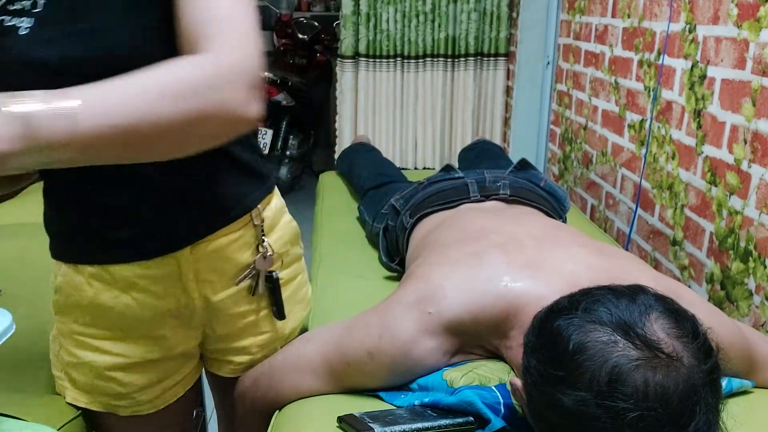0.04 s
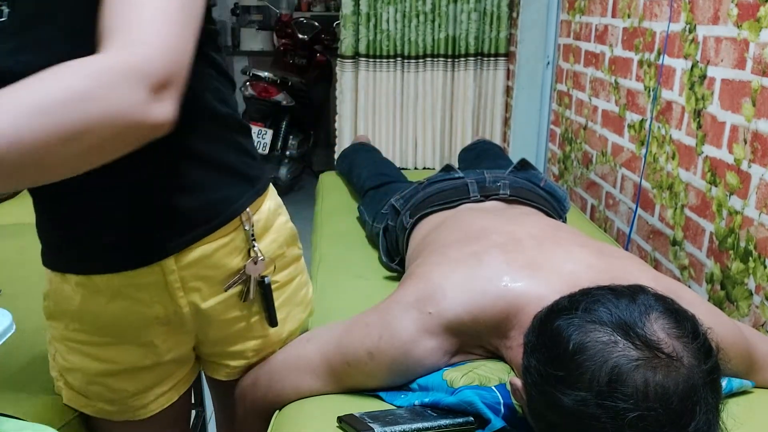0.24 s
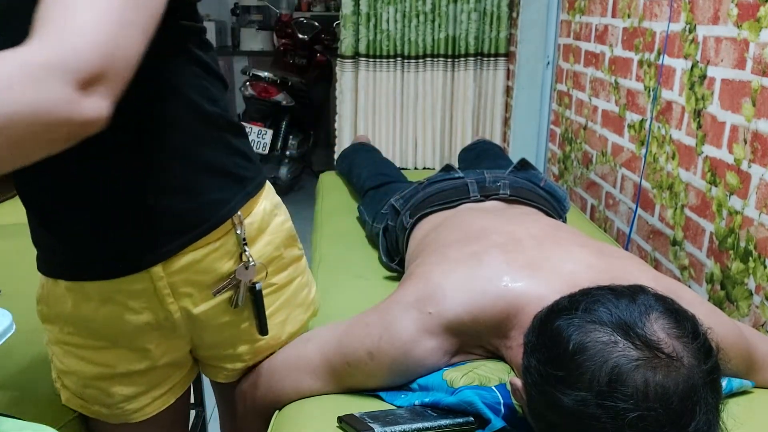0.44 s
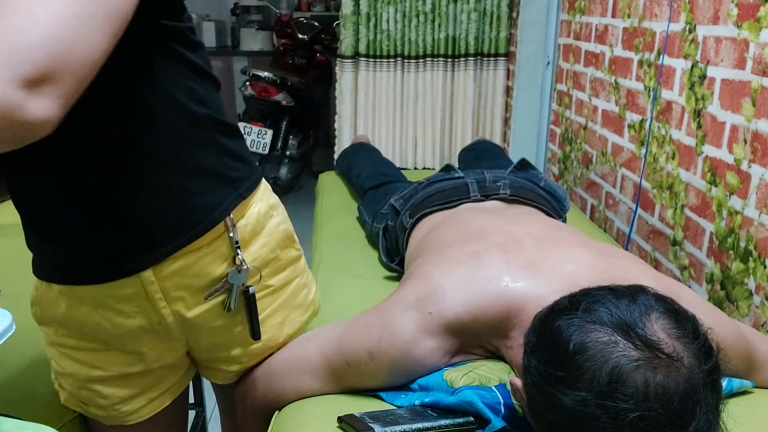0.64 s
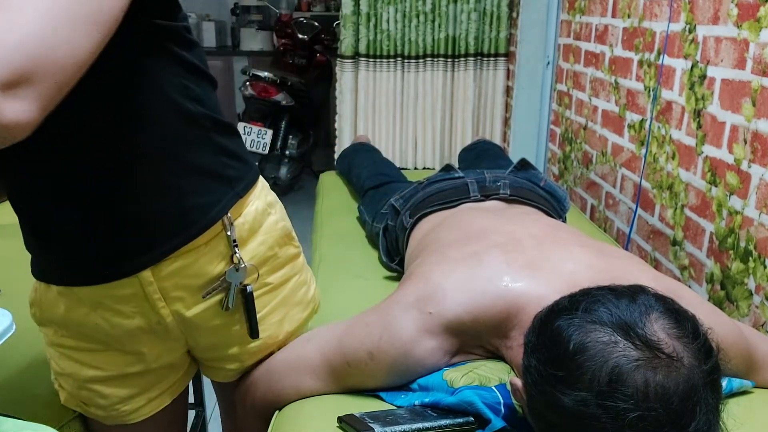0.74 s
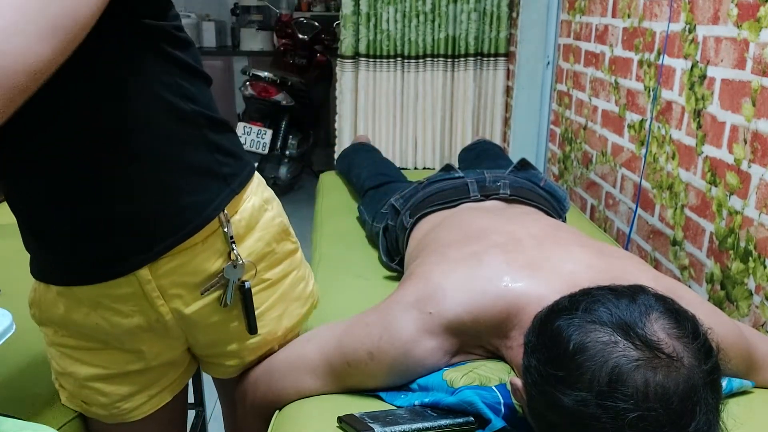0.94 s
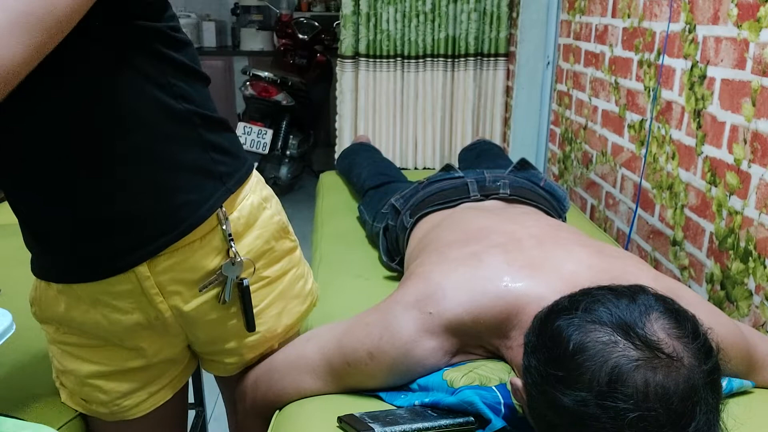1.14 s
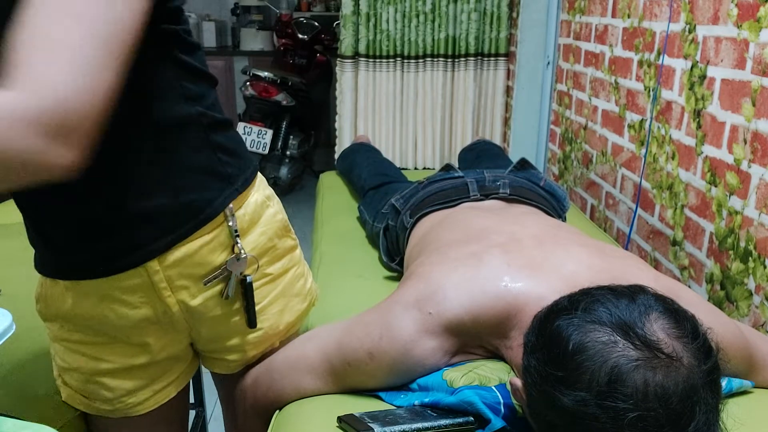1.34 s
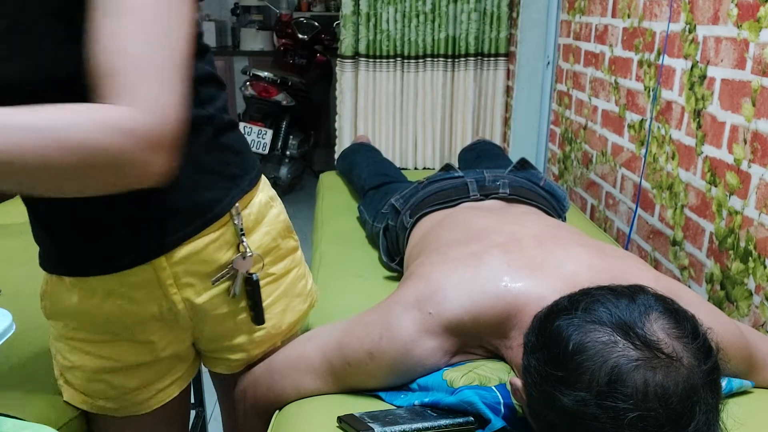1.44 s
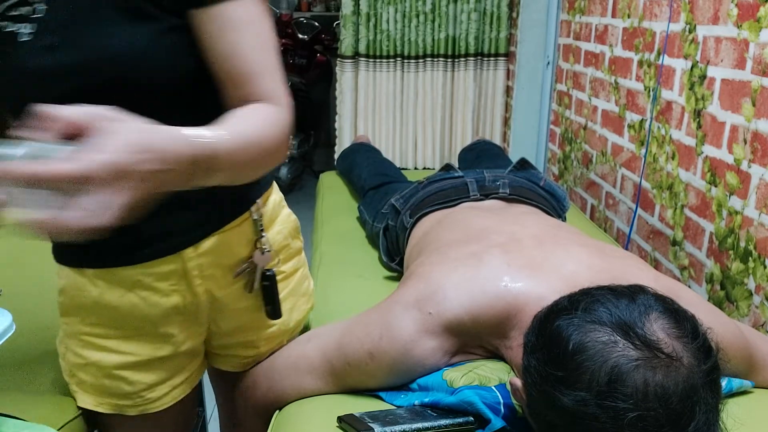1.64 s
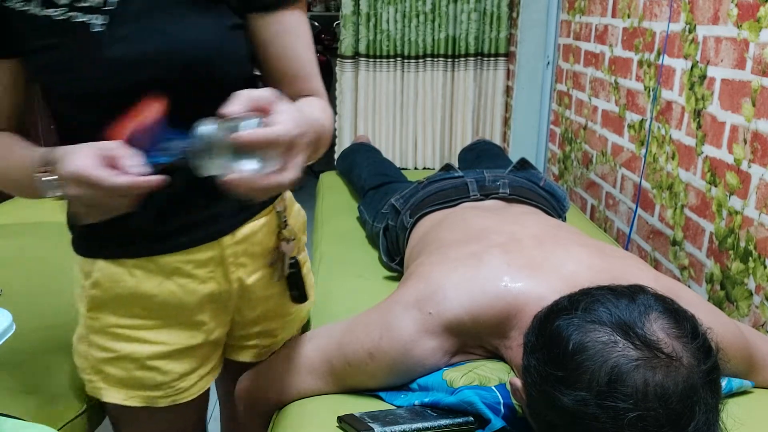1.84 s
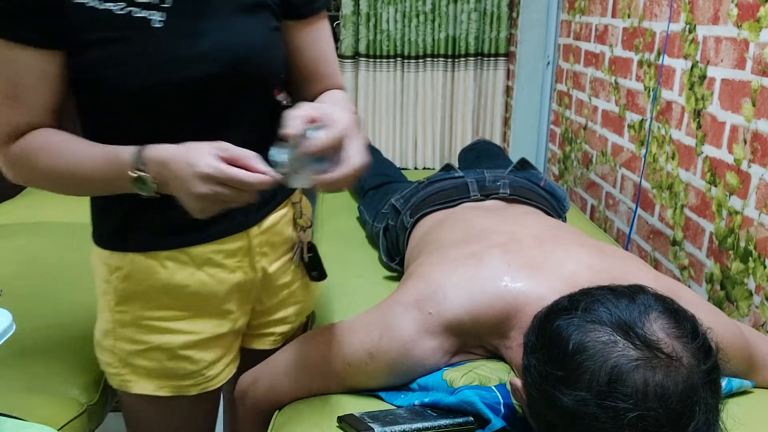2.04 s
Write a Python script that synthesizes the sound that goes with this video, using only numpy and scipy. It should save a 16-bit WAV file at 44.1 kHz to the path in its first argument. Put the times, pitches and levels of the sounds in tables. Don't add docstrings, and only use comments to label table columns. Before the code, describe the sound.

Glass cups knock and ring in two dense rattling bursts, followed by light clinks, a brief cloth brush and a late dull pop; close stereo phone microphone, lively small room, quiet fan.

```python
import sys
import numpy as np
from scipy import signal
from scipy.fft import rfft, irfft
from scipy.io import wavfile
from scipy.ndimage import uniform_filter1d

SR = 44100
rng = np.random.default_rng(int(sys.argv[2]) if len(sys.argv) > 2 else 0)


def transcribe(signal):
    frames = np.atleast_2d(signal).T
    limited = np.clip(frames, -1, 1)
    pcm = np.round(limited * 32767).astype(np.int16)
    wavfile.write(sys.argv[1], SR, pcm)


def natural_amplitude(level_db):
    exponent = np.asarray(level_db, float) / 20
    return 10 ** exponent


N = 92610
PORT_LAG_S = .00045


def colour(x, points):
    hz, db = np.array(points, float).T
    grid_hz = np.fft.rfftfreq(4096, 1 / SR)
    log_gain = np.interp(np.log(grid_hz + 1), np.log(hz), db) * np.log(10) / 20
    cepstrum = irfft(log_gain)
    cepstrum[1:2048] *= 2
    cepstrum[2049:] = 0
    return signal.fftconvolve(x, irfft(np.exp(rfft(cepstrum))))[:len(x)]


def unit(x):
    return x / np.sqrt(np.mean(x ** 2))


def add(track, x, at_s):
    i = int(at_s * SR)
    track[i:i + len(x)] += x[:N - i]


def ring(hz, t60, glide=0.):
    hz = np.atleast_1d(hz)[:, None]
    t = np.arange(int(SR * min(1.2 * t60, .6))) / SR
    return np.sin(2 * np.pi * hz * t * (1 + glide * t / t60)) * 1000. ** (-t / t60)


def walk(rate):
    k = int(SR / rate)
    steps = np.repeat(rng.standard_normal(N // k + 1), k)
    return unit(uniform_filter1d(uniform_filter1d(steps, k), k)[:N])


def ports(x):
    lag = np.exp(-2j * np.pi * np.fft.rfftfreq(len(x), 1 / SR) * PORT_LAG_S)
    return np.array([x, irfft(rfft(x) * lag, len(x))])


def air():
    # f/Hz, density/dB
    tone_colour = [(25, -45.5), (45, -3.5), (110, -3.5), (200, -8.5), (600, -11), (1000, -18.5),
                   (4000, -35), (14000, -37.5)]
    fan_hz = (91, 291, 711)
    # width/Hz, level/dB
    fan_bands = [
        (60.6, -60),
        (25, -62),
        (20, -67.5),
    ]
    # t/s, level/dB
    street = [(0, 1.5), (.2, 2.5), (.6, 5.5), (1.1, 0.7), (1.6, -2), (1.85, -1.35), (2.1, .3)]
    alike_hz, apart_db = 900, -11
    t = np.arange(N) / SR

    low = signal.butter(1, alike_hz, "low", fs=SR, output="sos")
    high = signal.butter(1, alike_hz, "high", fs=SR, output="sos")
    shared = signal.sosfilt(low, rng.standard_normal(N))
    both = shared + signal.sosfilt(high, rng.standard_normal((2, N)))
    both = both + natural_amplitude(apart_db) * rng.standard_normal((2, N))

    tone = natural_amplitude(-60) * unit(np.array([colour(ch, tone_colour) for ch in both]))
    for hz, (width_hz, db) in zip(fan_hz, fan_bands):
        band = signal.lfilter(*signal.iirpeak(hz, hz / width_hz, fs=SR), both)
        tone = tone + natural_amplitude(db + 1.6 * walk(1.7)) * unit(band)
    tone = tone + natural_amplitude(-63 + walk(4)) * np.sin(2 * np.pi * fan_hz[2] * t)
    left_right_db = np.array([[-0.5], [0]])
    return tone * natural_amplitude(0.34 * walk(1) + np.interp(t, *np.array(street).T) + left_right_db)


def cloth():
    # start/s, attack/s, release/s, level/dB
    rustles = [
        (1.113, .015, 0.046, -59),
        (1.405, 0.013, 0.024, -71),
        (1.452, .004, 0.026, -82),
    ]
    # f/Hz, level/dB
    fabric = [(500, -16), (2000, -4), (5000, -6), (12000, 21), (16000, 4)]
    t = np.arange(N) / SR
    env = 0
    for at, attack, release, db in rustles:
        rise = np.clip((t - at) / attack, 0, 1)
        fall = np.exp(-np.clip(t - at - attack, 0, 9) / release)
        env = env + natural_amplitude(db) * rise * fall
    grains = rng.standard_normal(N) * natural_amplitude(5.2 * walk(150))
    return env * unit(colour(grains, fabric))


def pop():
    at_s = 2.0312
    out = np.zeros(N)
    t = np.arange(1024) / SR
    puff = rng.standard_normal(1024) * np.exp(-t / 0.0079)
    puff = colour(puff, [(300, -11), (1200, 0.5), (3500, -0.5), (5000, -47.0)])
    add(out, natural_amplitude(-37.5) * puff, at_s)
    add(out, natural_amplitude(-25) * ring(1280, .007)[0], at_s)
    return signal.sosfilt(signal.butter(4, 4500, fs=SR, output="sos"), out)


def jostle():
    # t/s, level/dB
    bustle = [(.23, -89), (.236, -25), (.28, -52), (.29, -33.5), (.31, -26.5), (.36, -58.5), (.375, -25.5),
              (.45, -44), (.46, -26.5), (.49, -32), (.56, -71.5), (.69, -68.5), (.7, -30), (.78, -28),
              (.8, -35.5), (.85, -29), (.95, -48.5), (1.05, -68)]
    # f/Hz, level/dB
    patter = [(400, -23.5), (700, 4), (1000, -1.5), (1300, -7.5), (1900, 0), (2700, -7.5), (4200, -13.5),
              (9000, -40)]
    # f/Hz, width/Hz, level/dB
    chatter = [(4080, 89, -12.5), (5500, 300, -8.5), (7450, 330, -4.5), (8014, 460, -19), (12200, 170, -20),
               (13130, 270, -19.5), (14500, 200, -32)]
    per_s, scatter_db, burst_s = 900, 8, 0.0032
    t = np.arange(N) / SR
    ticks = (rng.random(N) < per_s / SR) * natural_amplitude(scatter_db * rng.standard_normal(N))
    env = signal.lfilter([1], [1, -np.exp(-1 / (burst_s * SR))], ticks)
    bursts = env * rng.standard_normal(N)
    out = unit(colour(bursts, patter))
    for hz, width_hz, db in chatter:
        peak = signal.iirpeak(hz, hz / width_hz, fs=SR)
        out = out + natural_amplitude(db) * unit(signal.lfilter(*peak, signal.lfilter(*peak, bursts)))
    return natural_amplitude(np.interp(t, *np.array(bustle).T, right=-200)) * out


def knocks():
    # t/s, level/dB, cavity f/Hz, cavity against level/dB
    main_knocks = [(0.2331, -15, 521.7, -4.5), (0.2838, -7.5, 540, -9.5), (0.3042, -15.5, 780, -7.5),
                   (0.3424, -35.5, 580, 10), (0.3682, -6.5, 594, -27), (0.3944, -20, 612, 0),
                   (0.415, -21, 690, -20), (0.4559, -10.5, 558, -11), (0.4724, -14, 738, -10),
                   (0.5887, -25.5, 835, -23.5), (0.6214, -32, 985, -9.5), (0.6654, -34, 792, -5.5),
                   (0.6956, -13, 1020, -5.5), (0.715, -20.5, 1040, -17.5), (0.7284, -23.5, 840, -18.5),
                   (0.7457, -11.5, 788, -15), (0.7684, -11, 1016, -7.5), (0.7904, -27, 777, 6.5),
                   (0.8083, -14, 680, -17.5), (0.8155, -15.5, 723, -13), (0.8277, -15.5, 732, -14.5),
                   (0.8425, -15.5, 741, -3), (0.8613, -17.5, 704, -11), (0.8894, -27, 960, -3),
                   (0.9363, -22, 1100, -8), (.95, -31, 791, -1.5), (.98, -40, 900, 3.5),
                   (1.075, -28.5, 600, -9.5), (1.1164, -62, 550, -9), (1.1458, -36.5, 789, -9),
                   (1.2034, -50.5, 658, 10), (1.2476, -46, 582, 3.5)]
    late_knocks = [
        (1.3543, -62, 290, 18),
        (1.4536, -35, 904, -11),
        (1.4674, -41, 763, 1),
        (1.4894, -42.5, 817, 4.5),
        (1.5094, -54.5, 246, 28),
    ]
    # f/Hz, level/dB
    tray = [(350, -24), (550, 1.5), (1000, 5), (1300, -6), (2000, 2), (3000, 0), (4500, -22.5), (9000, -24)]
    # f/Hz, level/dB
    crack = [(350, -35.5), (1000, 7), (2200, 3.5), (4000, 0.5), (6300, -24), (8500, -6), (10500, -11.5),
             (14500, -34)]
    # t/s, f/Hz, level/dB
    overtones = [
        (.2335, 2000, -4.5),
        (.2335, 1000, -13),
        (.6955, 1400, -15.5),
        (0.37, 3200, -30),
        (4.5, 810, -27),
        (1.247, 3000, -57),
        (0.66, 600, -27.5),
    ]
    cavity_t60_s, cavity_glide, cavity_rise_s, cavity_gain_db = 0.062, 0.022, 0.0023, 5.5
    tray_t60_s, tray_db, tray_scatter_db = 0.024, -17, 4.5
    crack_s, crack_db, snap_s, snap_db = 0.0013, -1.5, .0001, 3
    bounce_span_s, bounce_db = 0.036, -17.5

    out, cracks = np.zeros(N), np.zeros(N)
    t = np.arange(256) / SR
    tray_hz, tray_gain_db = np.array(tray).T
    for at, db, hz, cavity_db in list(main_knocks) + list(late_knocks):
        cavity = ring(hz, cavity_t60_s, cavity_glide)[0]
        rise = 1 - np.exp(-np.arange(len(cavity)) / (cavity_rise_s * SR))
        add(out, natural_amplitude(db + cavity_db + cavity_gain_db) * cavity * rise, at)
        add(cracks, -natural_amplitude(db + snap_db) * np.exp(-t / snap_s), at)

        modes_hz = 300 * 30. ** ((np.arange(70) + rng.random(70)) / 70)
        tilt_db = np.interp(np.log(modes_hz), np.log(tray_hz), tray_gain_db)
        modes = ring(modes_hz, tray_t60_s)
        when, size = rng.random(size=(2, 14))
        bounces = zip(bounce_span_s * when, bounce_db * (.5 + size + when))
        for late, loss_db in [(0.00066, 0.0018)] + list(bounces):
            gains = natural_amplitude(tilt_db + tray_scatter_db * rng.standard_normal(70)) * (-1) ** np.arange(70)
            add(out, natural_amplitude(db + loss_db + tray_db) * gains @ modes, at + late)
            burst = rng.standard_normal(256) * np.exp(-t / crack_s)
            add(cracks, natural_amplitude(db + loss_db + crack_db) * burst, at + late)
    for at, hz, db in overtones:
        add(out, natural_amplitude(db) * ring(hz, cavity_t60_s / 2)[0], at)
    return out + colour(cracks, crack)


def glass():
    # t/s, f/Hz, level/dB
    first_rims = [(.2335, 7660, -27.5), (.2335, 7890, -28.5), (.2335, 12370, -33), (.2335, 12990, -30),
                  (.2335, 8600, -46), (.2845, 7150, -20.5), (.2845, 7820, -24), (.2845, 7790, -22.5),
                  (.2845, 12780, -18), (.2845, 8260, -26), (.305, 5500, -28), (.305, 7000, -46),
                  (.325, 13980, -42), (.3685, 8230, -28.5), (.3685, 4075, -29), (.3685, 12760, -31.5),
                  (.3685, 13980, -38), (.4565, 7430, -21.5), (.476, 7860, -21), (.4565, 4080, -27.5),
                  (.4565, 8370, -29), (.474, 5600, -26), (.474, 6680, -44), (.474, 12740, -36.5),
                  (.474, 14050, -43.5), (1.454, 3980, -54.5), (1.454, 5410, -40), (1.47, 6870, -49),
                  (1.475, 13230, -51)]
    # t/s, f/Hz, level/dB
    second_rims = [(.6955, 7450, -24), (.6955, 12900, -18), (.6955, 13600, -35), (.6955, 15800, -22),
                   (.718, 7510, -23), (.718, 13400, -43), (.733, 5540, -38.5), (.729, 12390, -41),
                   (.729, 15500, -30.5), (.745, 7720, -23), (.745, 13450, -23.5), (.745, 12100, -24.5),
                   (.765, 3900, -32), (.765, 7660, -19), (.847, 5500, -21), (.866, 5490, -29),
                   (.815, 7500, -29.5), (.815, 7570, -21.5), (.89, 7500, -26), (.81, 4080, -34.5),
                   (.72, 3920, -33), (.809, 13170, -18.5), (.83, 12650, -24), (.812, 15300, -38),
                   (.828, 5490, -17), (.828, 5846, -17), (.835, 6410, -25), (.835, 7660, -20.5),
                   (.866, 7625, -21), (.87, 4034, -30.5), (1.076, 3990, -42.5), (1.076, 7470, -42),
                   (1.076, 13300, -47.5)]
    # t/s, f/Hz, level/dB
    faint_rims = [
        (0.62, 7770, -43),
        (1.078, 7800, -37.5),
        (0.92, 7750, -74),
        (1.126, 7900, -54),
        (1.454, 14220, -61),
    ]
    # t/s, f/Hz, level/dB, t60/s, swell/s
    driven_rims = [
        (.809, 5497, -0.5, 0.098, 0.0057),
        (.746, 5460, -16, .15, .005),
        (.3685, 7615, -8.5, 0.1, .003),
        (.4565, 7640, -10.5, 0.097, 0.0053),
    ]
    # t/s, f/Hz, level/dB, t60/s, swell/s
    free_rim = (1.47, 6445, -40, .33, .04)
    t60_s, rise_s, gain_db, rough_db = 0.086, 0.00075, -5, 4.5
    pair_hz, neighbour_db, neighbour_spread = 25, -17, 0.095

    out = np.zeros((2, N))
    struck = list(first_rims) + list(second_rims) + list(faint_rims)
    rows = [(*row, t60_s, rise_s) for row in struck]
    shaky = walk(120)
    for at, hz, db, t60, rise in rows + list(driven_rims) + [free_rim]:
        split, skew, start = rng.uniform(-1, 1, size=3)
        others = rng.uniform(-1, 1, size=5)
        pair = ring([hz, hz + pair_hz * split], t60)
        t = np.arange(pair.shape[1]) / SR
        shake = natural_amplitude(rough_db * np.roll(shaky, int(start * N))[:len(t)])
        tone = shake * (pair[0] + 0.44 * pair[1])
        crowd = ring(hz * (1 + neighbour_spread * others), t60_s).sum(axis=0)
        add(tone, natural_amplitude(neighbour_db) * crowd[:len(tone)], 0)
        tone = natural_amplitude(db + gain_db) * tone * (1 - np.exp(-t / rise))
        add(out[0], tone, at)
        add(out[1], tone, at + PORT_LAG_S + .00006 * skew)
    return out


def room(x):
    # f/Hz, level/dB
    walls = [(3000, -1), (5500, -1.5), (8500, 1.5), (10500, -6), (12500, -0.5), (14000, 1.5), (15200, -11)]
    low_t60_s, treble_t60_s, late_t60_s = 0.22, 0.25, 0.71
    level_db, late_db, share, gap_s = -5, -19.5, 0.24, 0.0016
    t = np.arange(int(.5 * SR)) / SR

    def echoes():
        return rng.standard_normal(len(t)) * natural_amplitude(4.04 * rng.standard_normal(len(t)))

    tail = np.sqrt(share) * ports(echoes()) + np.sqrt(1 - share) * np.array([echoes(), echoes()])
    low = signal.sosfilt(signal.butter(2, 3000, fs=SR, output="sos"), tail)
    after_gap = t > gap_s
    tail = (low * 1000. ** (-t / low_t60_s) + (tail - low) * 1000. ** (-t / treble_t60_s)) * after_gap
    tail = tail + natural_amplitude(late_db) * rng.standard_normal(tail.shape) * 1000. ** (-t / late_t60_s) * after_gap

    spectrum = rfft(tail)
    tail = irfft(spectrum / np.sqrt(uniform_filter1d(np.abs(spectrum) ** 2, 30)), len(t))
    fade = np.clip((.44 - t) / .1, 0, 1)
    tail = np.array([colour(ch, walls) for ch in tail * fade])
    tail = natural_amplitude(level_db) * tail / np.sqrt(np.sum(tail ** 2) / 2)
    return signal.fftconvolve(x[None], tail, axes=1)[:, :N]


def scene():
    near = knocks() + jostle() + cloth()
    near = signal.sosfilt(signal.butter(4, 430, "high", fs=SR, output="sos"), near)
    rims = glass()
    held = pop()
    wet = room(near + held + natural_amplitude(-4.5) * rims[0])
    balance = natural_amplitude(np.array([[1.82], [-1.82]]) / 2)
    return (ports(near) + rims + wet) * balance + held + air()


def band_limit(x):
    return signal.sosfilt(signal.butter(12, 16650, fs=SR, output="sos"), x)


def record(dry):
    cut = signal.sosfilt(signal.ellip(8, .2, 60, 15800, fs=SR, output="sos"), dry)
    mix = np.tanh(0.72 * cut) / 0.51
    return band_limit(mix)


dry = scene()
out = record(dry)
transcribe(out)
```